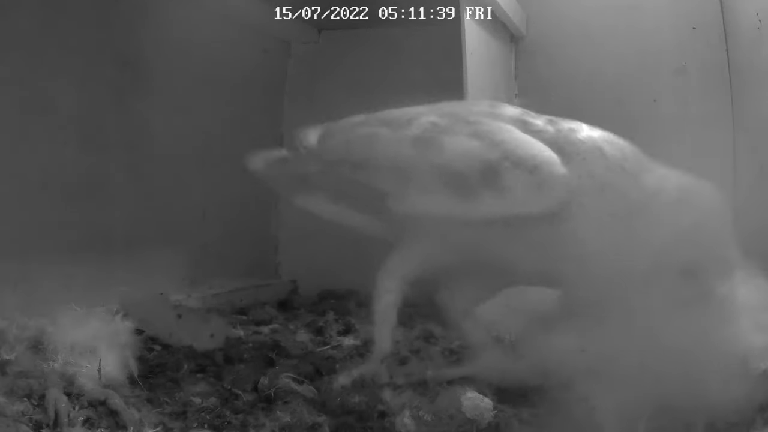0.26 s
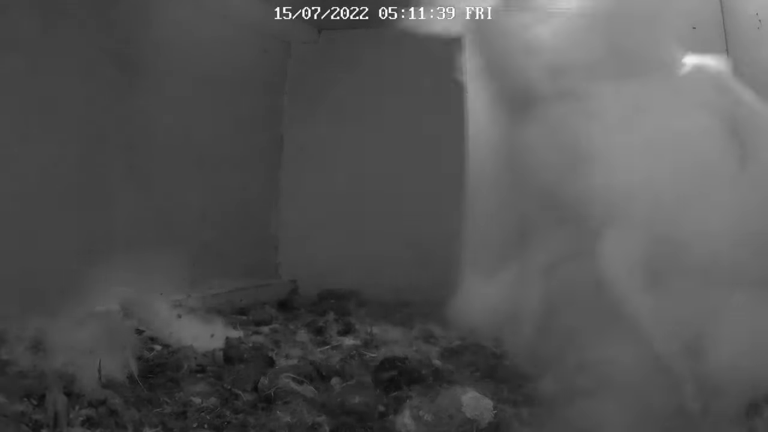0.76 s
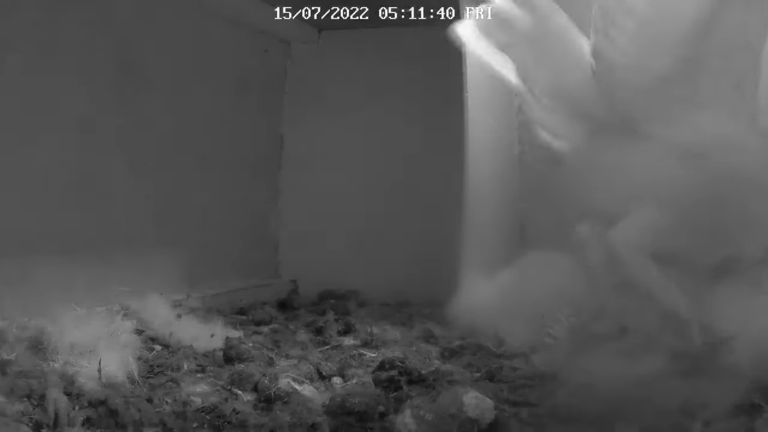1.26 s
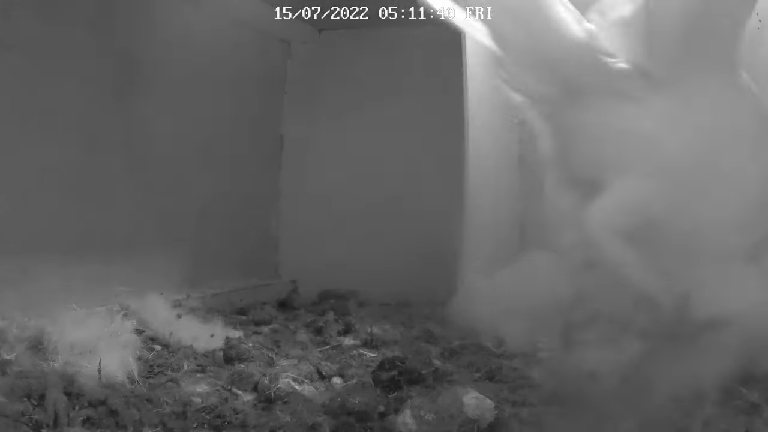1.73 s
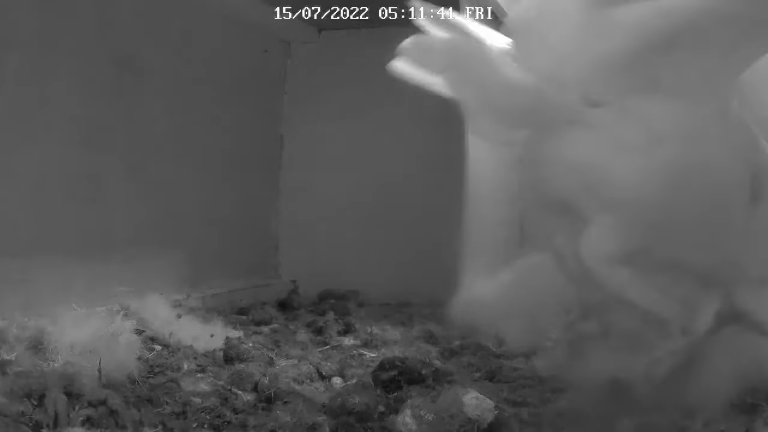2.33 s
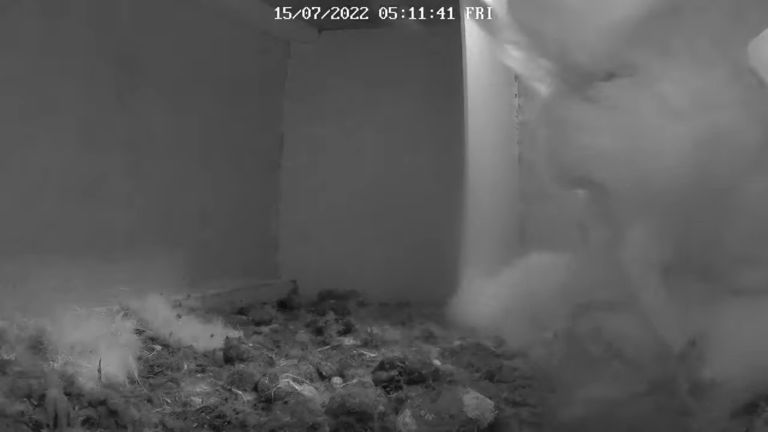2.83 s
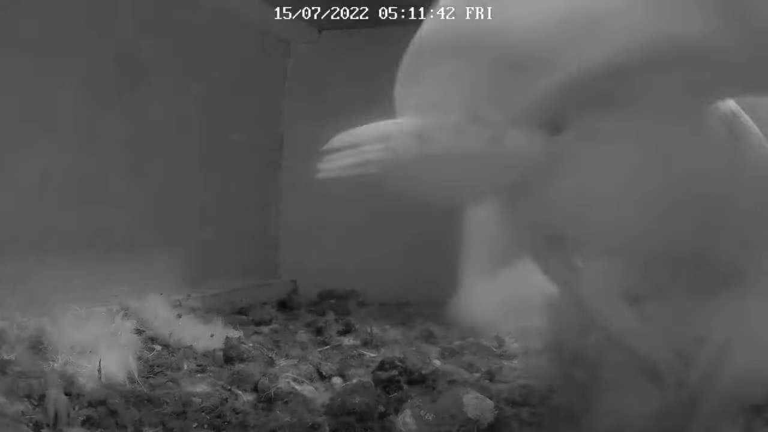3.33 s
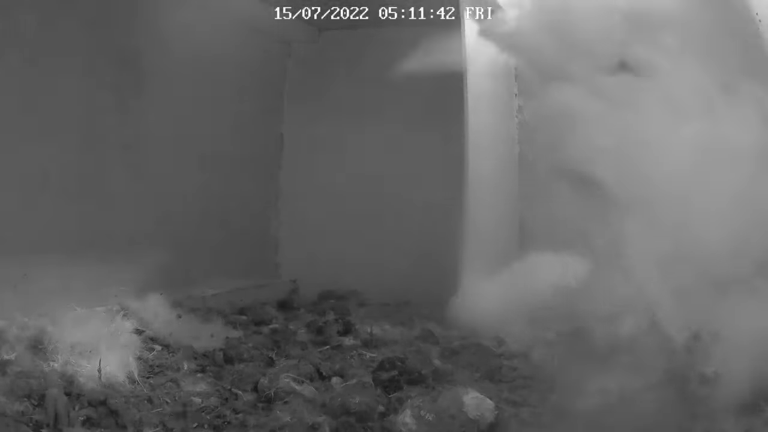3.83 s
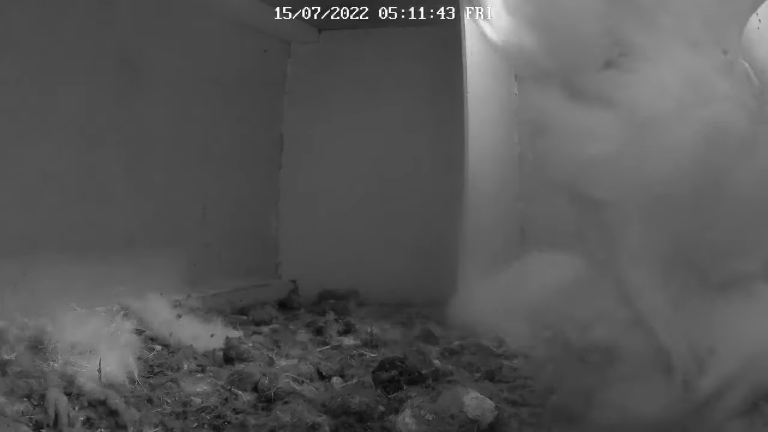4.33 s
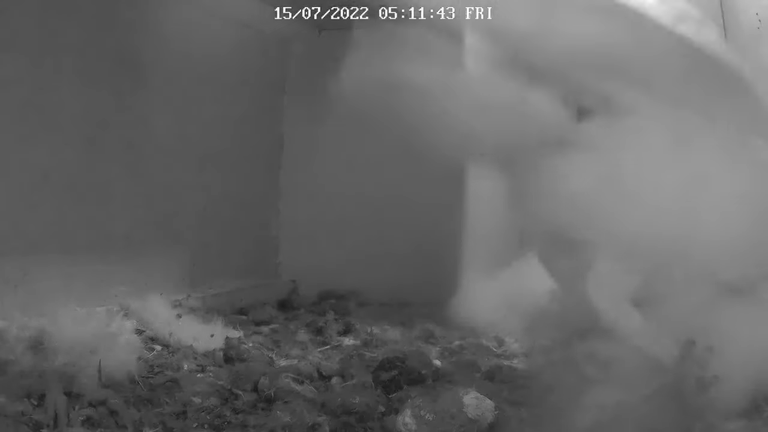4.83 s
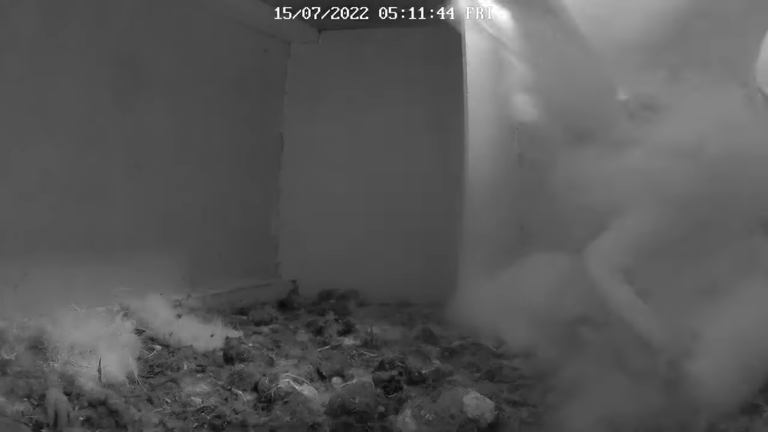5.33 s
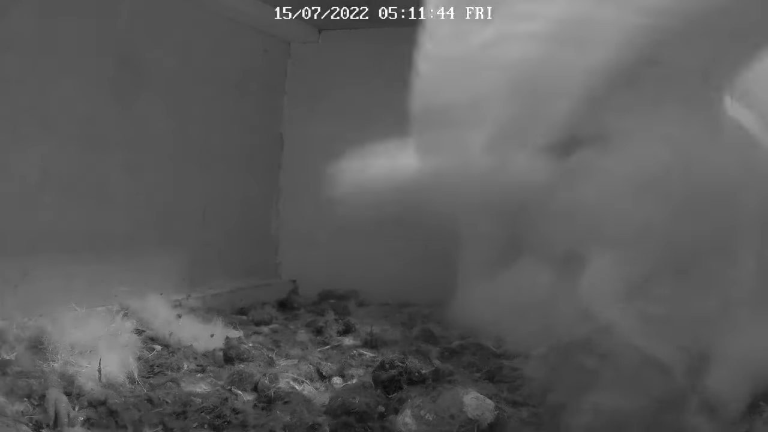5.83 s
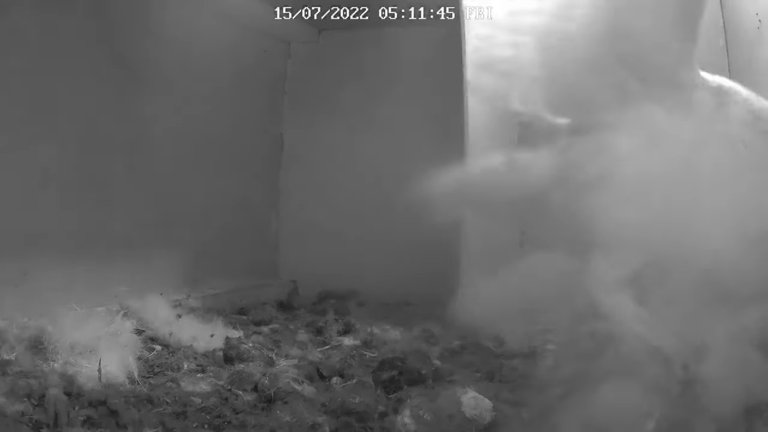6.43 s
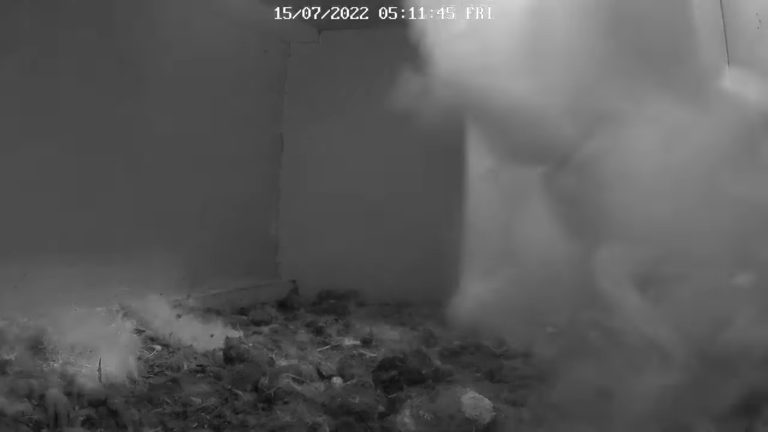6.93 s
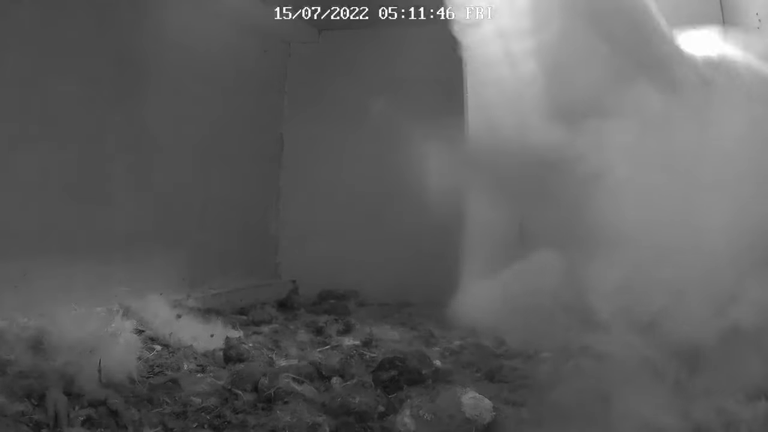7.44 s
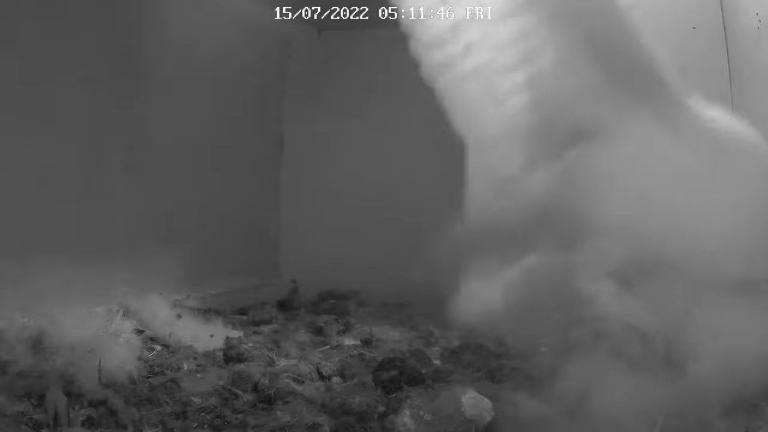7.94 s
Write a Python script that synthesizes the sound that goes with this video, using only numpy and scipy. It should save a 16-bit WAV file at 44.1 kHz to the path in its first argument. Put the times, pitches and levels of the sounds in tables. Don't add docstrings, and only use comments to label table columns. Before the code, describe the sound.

Inside a small wooden nest box at dawn, owls shuffle and bump the walls with low, hollow thuds, brushing feathers and ticking claws. Outside, small birds whistle thinly and a pigeon coos huskily. Strong blows land midway, a brief hissy screech follows, then the hardest bang overloads the small, dull microphone. The loudest screech closes the scene over steady hiss and a faint whine.

```python
import sys
import numpy as np
from scipy import signal
from scipy.fft import rfft, irfft
from scipy.io import wavfile
from scipy.ndimage import uniform_filter1d

SR = 44100
rng = np.random.default_rng(int(sys.argv[2]) if len(sys.argv) > 2 else 0)


def generate_wav(signal):
    frames = np.transpose(np.atleast_2d(signal))
    scaled = np.clip(frames, -1, 1) * 32767
    pcm = np.round(scaled).astype(np.int16)
    wavfile.write(sys.argv[1], SR, pcm)


def field_ratio(decibels):
    return 10 ** (np.asarray(decibels, dtype=float) / 20)


N = 360297


def rms_one(x):
    return x / np.sqrt(np.mean(x ** 2) + 1e-20)


def drift(rate_hz):
    r = np.exp(-2 * np.pi * rate_hz / SR)
    noise = rng.standard_normal(N + SR)
    return rms_one(signal.lfilter([1], [1, -2 * r, r * r], noise)[SR:])


def resonate(x, peaks):
    out = 0
    for k, (hz, width_hz, db) in enumerate(peaks):
        r = np.exp(-np.pi * width_hz / SR)
        b = (1 - r * r) / 2 * np.array([1, 0, -1])
        a = [1, -2 * r * np.cos(2 * np.pi * hz / SR), r * r]
        out = out + (-1) ** k * field_ratio(db) * signal.lfilter(b, a, x)
    return out


def butter(order, hz, side, x):
    return signal.sosfilt(signal.butter(order, hz, side, fs=SR, output="sos"), x)


def played(notes, fade_s):
    t = np.arange(N) / SR
    s, *columns = np.transpose(np.concatenate(notes))
    gate = 0
    for note in notes:
        start_s, end_s = note[0][0], note[-1][0] + fade_s
        gate = gate + np.clip(np.minimum(t - start_s, end_s - t) / fade_s, 0, 1)
    return [np.interp(t, s, c) for c in columns] + [gate]


def sung(rows, hurry, scoop, scoop_s, droop, droop_s, edge_db, attack_s, release_s, sag_db, lag=1):
    u = np.linspace(0, 1, num=41)
    notes = []
    for s, length_s, from_hz, to_hz, db in rows:
        t, left = u * length_s, (1 - u) * length_s
        progress = (1 - np.exp(-hurry * u ** lag)) / (1 - np.exp(-hurry))
        glide_hz = from_hz + (to_hz - from_hz) * progress
        hz = glide_hz * (1 - scoop * np.exp(-t / scoop_s) - droop * np.exp(-left / droop_s))
        edges = np.exp(-t / attack_s) + np.exp(-left / release_s)
        notes.append(np.transpose([s + t, hz, db - edge_db * edges - sag_db * u]))
    return notes


def in_order(notes):
    return sorted(notes, key=lambda note: note[0][0])


def tone(notes, fade_s, wobble, flutter_db, flutter_hz):
    hz, db, gate = played(notes, fade_s)
    phase = 2 * np.pi * np.cumsum(hz * (1 + wobble * drift(flutter_hz))) / SR
    return np.sqrt(2) * gate * field_ratio(db + flutter_db * drift(flutter_hz)) * np.sin(phase)


def stack(hz, levels_db, wobble, wobble_hz, flutter_db):
    phase = 2 * np.pi * np.cumsum(hz * (1 + wobble * drift(wobble_hz))) / SR
    out = 0
    for k, db in enumerate(levels_db, start=1):
        out = out + field_ratio(db + flutter_db * drift(85)) * np.sin(k * phase)
    return np.sqrt(2) * out


def outdoors(x, wet_db, t60_s):
    t = np.arange(SR // 2) / SR
    tail = rng.standard_normal(len(t)) * field_ratio(-60 * t / t60_s) * (t > .012)
    tail = tail / np.sqrt(np.sum(tail ** 2))
    return x + field_ratio(wet_db) * signal.fftconvolve(x, tail)[:N]


# frequency in Hz, density in dB per Hz.
AIR_SPECTRUM = [(41, -28), (70, -4), (150, -7), (299, -6), (357, -17.5), (425, 2), (708, -28.5), (862, -16),
                (1580, -31), (3080, -31), (4940, -30), (5340, -30), (7600, -32), (9880, -63), (16700, -120)]
# frequency in Hz, width in Hz, level in dB.
HUM_PEAK = [(45.7, 12, -56.5)]
AIR_DB, WHINE_HZ, WHINE_DB, WHINE_BEAT_HZ = -62, 5097, -82, 14


def air():
    hz, db = np.transpose(AIR_SPECTRUM)
    grid_hz = np.minimum(np.arange(1, N // 2 + 2) * SR / N, 7000)
    colour = field_ratio(np.interp(np.log(grid_hz), np.log(hz), db))
    hiss = irfft(rfft(rng.standard_normal(N)) * colour, N)
    t = np.arange(N) / SR
    beat = 1 + .25 * np.sin(2 * np.pi * WHINE_BEAT_HZ * t)
    whine = beat * np.sin(2 * np.pi * WHINE_HZ * t)
    hum_hz, hum_width_hz, _ = HUM_PEAK[0]
    narrow = rms_one(resonate(rng.standard_normal(N), [(hum_hz, hum_width_hz, 0)]))
    hum = resonate(narrow, HUM_PEAK)
    return field_ratio(AIR_DB + 0.34 * drift(6.7)) * rms_one(hiss) + hum + field_ratio(WHINE_DB) * rms_one(whine)


# time in seconds, wall rumble in dB.
SHUFFLE = [(0.0, -61.5), (0.6, -86), (0.86, -60), (0.95, -59.5), (1.2, -51.5), (1.36, -60.5), (2.02, -60),
           (2.84, -65), (3.3, -64), (3.64, -63), (4.0, -65.5), (4.8, -66.5), (5.37, -57), (6.1, -58),
           (6.6, -64), (7.05, -58.5), (7.3, -56.5), (8.17, -54)]


def shuffling_db():
    return played([SHUFFLE], .01)[0]


# start in seconds, then boom, panel and knock in dB.
THUMPS = [(0.912, -52, -39.5, -51), (0.961, -34.5, -51, -37), (1.014, -34.5, -42, -38.5),
          (1.049, -35.5, -74, -55), (1.109, -43, -49, -61), (1.158, -51, -54, -46),
          (1.233, -28.5, -24, -21), (1.395, -53, -61, -52), (1.821, -35.5, -32.5, -78),
          (2.028, -70, -74, -47.5), (2.078, -75, -75, -49), (2.268, -57, -70, -47.5),
          (2.776, -47.5, -50, -45.5), (3.63, -60, -48, -52), (3.708, -51, -47, -52),
          (4.241, -21.5, -28, -32.5), (5.412, -14, -17, -32.5), (5.869, -51, -73, -71),
          (5.952, -48, -33.5, -36), (6.499, -34, -35, -60), (6.848, -84, -64, -57.5),
          (7.311, -13, -8.5, -7.5), (7.553, -26, -34, -69), (8.15, -31.5, -57, -45)]
RAP_DB, HARDEST_DB = -24.5, 6.5
SETTLE_DB, SETTLE_S = -22, 0.057


def blow_strengths_db():
    _, boom_db, panel_db, knock_db = np.transpose(THUMPS)
    hardness_db = np.minimum(knock_db - boom_db, HARDEST_DB)
    return np.column_stack([boom_db, panel_db, knock_db, knock_db + RAP_DB + 1.2 * hardness_db])


def settling():
    s, boom_db = np.array(THUMPS)[:, :2].T
    kicks = np.zeros(N)
    kicks[((s + .012) * SR).astype(int)] = field_ratio(SETTLE_DB + boom_db)
    dying = signal.lfilter([1], [1, -np.exp(-1 / (SETTLE_S * SR))], kicks + 1e-18)
    return uniform_filter1d(uniform_filter1d(dying, size=400), size=400)


def ring(x, hz, t60_s):
    r, w = field_ratio(-60 / (t60_s * SR)), 2 * np.pi * hz / SR
    return signal.lfilter([0, np.sin(w)], [1, -2 * r * np.cos(w), r * r], x + 1e-18)


# frequency in Hz, level in dB, t60 in seconds.
BOOM_MODES = [(107.2, -1, 0.37), (134.2, 3.5, 0.16), (155.5, -4, 0.16)]
PANEL_MODES = [(222.3, -2.5, 0.25), (282, -2, 0.074), (313, -11, 0.13)]
KNOCK_MODES = [(354.3, -1.5, 0.072), (398.4, -8.5, 0.17), (455, -4.5, 0.13), (515.3, -3.5, 0.15)]
RAP_MODES = [(762, -4.5, 0.051), (816, -2, 0.13), (1034, -14, 0.086)]
# cut-off in Hz, share in the shuffling in dB, first flex in Hz, flex in dB.
CONTACT = [(202, -5, 161, -1.5), (400, 0, 232, -1), (630, 0.5, 332.7, 8.5), (1160, -26.5, 640, 11)]


def walls(rumble):
    strength_db = blow_strengths_db()
    at = ((np.array(THUMPS)[:, 0] + .002) * SR).astype(int)
    bump_sizes = field_ratio(2.57 * np.minimum(rng.exponential(1, N), 4))
    bumps = (rng.random(N) < 160 / SR) * bump_sizes
    groups = (BOOM_MODES, PANEL_MODES, KNOCK_MODES, RAP_MODES)
    blows, shuffle = 0, 0
    for group, (modes, contact) in enumerate(zip(groups, CONTACT)):
        contact_hz, bump_db, flex_hz, flex_db = contact
        push, rings = np.zeros(N), 0
        push[at] = field_ratio(strength_db[:, group])
        for hz, db, t60_s in modes:
            uneven = np.ones(N)
            uneven[at] = field_ratio(2.0 * rng.standard_normal(len(at)))
            rings = rings - field_ratio(db - 4) * ring(push * uneven, hz, t60_s)
            shuffle = shuffle + field_ratio(db + bump_db) * ring(bumps * rng.standard_normal(N), hz, 0.59 * t60_s)
        cycles = np.arange(int(3 * SR / flex_hz)) * flex_hz / SR - 1
        onset = np.sin(np.pi / 2 * np.clip(2 * (cycles - cycles[0]), 0, 1)) ** 2
        flex = np.exp(-(cycles / 0.6) ** 2) * onset * np.cos(2 * np.pi * cycles)
        blows = blows + butter(4, contact_hz, "low", rings)
        blows = blows + field_ratio(flex_db) * signal.fftconvolve(push, flex)[:N]
    shuffle = rms_one(butter(4, 600, "low", shuffle))
    return butter(2, 80, "high", blows + rumble * shuffle)


# start in seconds, peak in dB, brightness in dB.
TICKS = [(0.945, -67, 3), (1.2488, -60.5, -1), (1.4261, -58, -7), (1.449, -50.5, -23), (2.7142, -78, 5),
         (2.8687, -78, 0), (3.5438, -59, -12), (3.634, -60, -21), (5.4757, -52.5, -0.5),
         (5.8698, -62.5, -1), (5.89, -57.5, -6), (5.9534, -45, -14.5), (6.3904, -74, 13),
         (6.5197, -57, -0.5), (6.8568, -66.5, 7), (6.9321, -60.5, 1), (6.9524, -59.5, -0.5),
         (7.0349, -59, -11), (7.561, -66, 0), (7.7642, -49.5, -10), (7.8865, -61, 3)]
# frequency in Hz, width in Hz, level in dB.
CAVITY = [(912, 280, -2.5), (2087, 240, -2.5), (2880, 260, -4), (4020, 246, 1), (5070, 470, -4.5),
          (6900, 1100, -14)]
TICK_T60_S, TICK_RISE_S, BRIGHT_HZ = .036, .003, 3400
RUSTLE_DB, RUSTLE_FOLLOWS = -79, 0.9


def claws_and_feathers(shuffle_db):
    force = np.zeros((2, N))
    t = np.arange(SR // 10) / SR
    decay = field_ratio(-60 * np.maximum(t - TICK_RISE_S, 0) / TICK_T60_S)
    shape = decay * np.minimum(t / TICK_RISE_S, 1)
    for s, db, bright_db in TICKS:
        first = int(s * SR)
        force[:, first:first + len(t)] += field_ratio(np.array([[db], [db + bright_db]])) * shape
    rustle_db = RUSTLE_DB + RUSTLE_FOLLOWS * (shuffle_db + 60.5)
    grains = field_ratio(rustle_db + 2.62 * drift(25))
    dull, bright = (force + grains) * rng.standard_normal(N)
    both = butter(4, BRIGHT_HZ, "low", dull) + butter(4, BRIGHT_HZ, "high", bright)
    return resonate(both, CAVITY) * field_ratio(13.5)


# start in seconds, length in seconds, pitch from and to in Hz, level in dB.
WHISTLES = [
    (.08, 0.094, 3500, 4300, -74),
    (.16, .05, 3390, 4150, -70),
    (1.47, 0.15, 3290, 4030, -72.5),
    (1.69, .06, 3810, 3990, -67),
    (2.12, 0.065, 3540, 4240, -80),
    (3.04, .12, 3243, 4050, -70.5),
    (4.58, 0.096, 3250, 4010, -68),
    (5.99, 0.1, 3230, 4020, -67),
    (7.78, 0.11, 3400, 4090, -57.5),
]
SLIDES = [
    (.54, .075, 4704, 4160, -67),
    (2.41, .07, 3780, 3310, -83),
]
WHISTLER = dict(lag=2.0, hurry=8.0, scoop=.001, scoop_s=.01, droop=.001, droop_s=.01, edge_db=15, attack_s=.022, release_s=.015, sag_db=-1.5)


def far_whistler():
    slider = dict(WHISTLER, lag=0.96, hurry=0.28, attack_s=0.0078, sag_db=1.5)
    calls = in_order(sung(WHISTLES, **WHISTLER) + sung(SLIDES, **slider))
    far = tone(calls, 0.0049, wobble=.012, flutter_db=5.5, flutter_hz=60.5)
    far = far + field_ratio(-6.5) * np.roll(far, int(.028 * SR))
    return outdoors(far, wet_db=-5, t60_s=0.3)


# start in seconds, length in seconds, pitch from and to in Hz, level in dB.
SONG = [
    (.16, 0.028, 5550, 5800, -59),
    (.335, 0.078, 6640, 6690, -87),
    (.705, 0.089, 5020, 4620, -45.5),
    (4.72, .035, 4270, 3850, -62),
    (7.425, 0.17, 3810, 3858, -72.5),
    (7.935, .065, 5700, 6160, -69.5),
]
# seconds into the slur, pitch in Hz, level in dB.
SLUR = [(0, 6830, -94), (.022, 6160, -76), (.04, 5900, -56), (.058, 5500, -72), (.068, 4950, -58.5),
        (.082, 4520, -61.5), (.1, 4640, -78), (.125, 4520, -91)]
SLUR_STARTS_S = [.022, .192]
# time in seconds, pitch in Hz, level in dB.
HOOK = [(.52, 6850, -78), (.528, 6950, -77), (.548, 6450, -76), (.562, 6020, -66), (.575, 6000, -66),
        (.6, 6300, -76), (.65, 6350, -88)]
ARCH = [(1.39, 4220, -69), (1.415, 4380, -67), (1.44, 4280, -60), (1.465, 3990, -54.5), (1.49, 3910, -70)]
SONGBIRD = dict(hurry=2.4, scoop=0.00062, scoop_s=0.0081, droop=0.0006, droop_s=0.0091, edge_db=28.5, attack_s=0.003, release_s=0.0088, sag_db=8)


def near_songbird():
    slurs = [np.array(SLUR) + [s, 0, 0] for s in SLUR_STARTS_S]
    song = in_order(sung(SONG, **SONGBIRD) + [HOOK, ARCH] + slurs)
    near = tone(song, 0.0048, wobble=0.0032, flutter_db=3.5, flutter_hz=60)
    return outdoors(near, wet_db=-18.5, t60_s=.25)


# start in seconds, length in seconds, pitch from and to in Hz, level in dB.
COOS = [(1.49, 0.35, 425.3, 593.4, -54.5), (2.15, 0.3, 475, 419.3, -56), (2.71, 0.24, 530, 445, -50),
        (3.03, 0.44, 455, 443.4, -53), (3.72, 0.23, 490, 566.7, -53), (4.25, 0.22, 535, 554, -55.5),
        (4.87, 0.39, 490, 402.4, -54.5), (5.53, 0.19, 530, 420, -45.5), (5.86, 0.091, 514.3, 508, -43.5),
        (6.01, .33, 452, 456.6, -51), (6.62, 0.28, 497.3, 561, -56), (6.93, 0.069, 565.3, 543, -52.5),
        (7.14, .41, 523.6, 542.4, -46.5), (7.58, 0.075, 542, 441, -47), (7.78, 0.19, 510, 435, -48.5),
        (7.97, .22, 485, 445.7, -45)]
PIGEON = dict(hurry=0.488, scoop=0.18, scoop_s=.014, droop=.17, droop_s=.016, edge_db=13.5, attack_s=0.0067, release_s=0.024, sag_db=1)


def pigeon():
    coo = tone(sung(COOS, **PIGEON), .02, wobble=.014, flutter_db=2.6, flutter_hz=40)
    return outdoors(coo, wet_db=-6.5, t60_s=0.44)


# start in seconds, length in seconds, pitch from and to in
# Hz, level in dB.
PEEP = [
    (4.715, 0.044, 2250, 2090, -67),
]
HALF_LINE = [
    (8.128, .05, 3560, 3660, -52),
]


def thin_lines():
    lines = sung(PEEP, **SONGBIRD) + sung(HALF_LINE, **WHISTLER)
    return tone(lines, .006, wobble=.005, flutter_db=1.1, flutter_hz=60)


# time in seconds, pitch in Hz, level in dB, beak closure as extra fundamental in dB.
VOICED = [
    [(5.17, 1489, -72, 14), (5.192, 1584, -53, -1), (5.215, 1597, -56.5, -12), (5.25, 1640, -73, 0),
     (5.28, 1623, -61, 7)],
    [(5.375, 1592, -66, -3), (5.389, 1643, -56.5, -11), (5.407, 1518, -67.5, 7), (5.415, 1390, -81, -4)],
    [(7.208, 1660, -70, 0), (7.22, 1555, -61.5, 17), (7.233, 1466, -64, 24), (7.247, 1293, -77, 4)],
    [(8.04, 1284, -53.5, 8), (8.054, 1356, -46.5, -4), (8.078, 1526, -36, -1.5), (8.1, 1572, -43, 2),
     (8.125, 1565, -41.5, -3), (8.148, 1435, -41, 9.5), (8.17, 1406, -46.5, -10)],
]
# frequency in Hz, level in dB.
WINDPIPE = [(1450, -14.5), (2600, -1.5), (3100, 0.5), (4200, 7), (4700, -9), (6000, -34), (7500, -29.5)]


def clean_screeches():
    hz, db, closure_db, gate = played(VOICED, 0.0026)
    pipe_hz, pipe_db = np.transpose(WINDPIPE)
    levels_db = [db + np.interp(k * hz, pipe_hz, pipe_db) for k in range(1, 6)]
    levels_db[0] = levels_db[0] + closure_db
    return gate * stack(hz, levels_db, wobble=0.0042, wobble_hz=119, flutter_db=3.0)


# start in seconds, length in seconds, narrow hiss in dB, wide breath in dB.
HISSED = [
    (5.2, 0.196, -54.5, -69.5),
    (7.073, .135, -68.5, -66.5),
    (8.071, 0.05, -48, -70),
]
# frequency in Hz, width in Hz, level in dB.
THROAT = [(1934, 37, -7), (3775, 230, -2), (4184, 121, 6), (6030, 140, -47), (6910, 680, -33)]
OWL = dict(hurry=1.1, scoop=.001, scoop_s=.01, droop=.001, droop_s=.01, edge_db=24, attack_s=.012, release_s=.01, sag_db=-21)
BREATH_FOLLOWS = 0.44


def hissed_screeches():
    swells = sung([(s, length_s, 1, 1, 0) for s, length_s, *_ in HISSED], **OWL)
    notes = []
    for swell, (_, _, hiss_db, breath_db) in zip(swells, HISSED):
        t, _, swell_db = swell.T
        notes.append(np.transpose([t, hiss_db + swell_db, breath_db + BREATH_FOLLOWS * swell_db]))
    hiss_db, breath_db, gate = played(notes, 0.01)
    breath = rng.standard_normal((2, N)) * field_ratio(0.53 * drift(90))
    narrow = rms_one(resonate(resonate(breath[0], THROAT), [(3160, 4700, 0)]))
    wide = rms_one(resonate(breath[1], CAVITY))
    return gate * (field_ratio(hiss_db) * narrow + field_ratio(breath_db) * wide)


# time in seconds, pitch in Hz, level in dB.
DRONE = [
    [(7.07, 713, -78), (7.12, 720, -65), (7.19, 720, -62), (7.215, 729, -71)],
]
DRONE_HARMONICS_DB = [-3, -7, -5.5, -3, -1.5, -18, -10.5, -11, -9.5, -10]


def hoarse_drone():
    hz, db, gate = played(DRONE, .01)
    return gate * field_ratio(db) * stack(hz, DRONE_HARMONICS_DB, wobble=0.011, wobble_hz=150, flutter_db=4.5)


def scene():
    shuffle_db = shuffling_db()
    box = walls(field_ratio(shuffle_db) + settling()) + claws_and_feathers(shuffle_db)
    outside = far_whistler() + near_songbird() + pigeon()
    owls = thin_lines() + clean_screeches() + hissed_screeches() + hoarse_drone()
    return (air() + box + outside + owls)[None]


def roll_off(x):
    return signal.sosfilt(signal.butter(12, 8480, fs=SR, output="sos"), x)


# start in seconds, end in seconds.
STARVED = [
    (1.222, 1.278),
    (7.301, 7.358),
    (8.006, 8.062),
]
STARVED_HZ, CUTOFF_HZ, OVERLOAD = 4650, 7650, .978


def record(dry):
    full = signal.sosfilt(signal.ellip(10, .5, 70, CUTOFF_HZ, fs=SR, output="sos"), dry)
    top = signal.sosfiltfilt(signal.ellip(8, .01, 60, STARVED_HZ, "high", fs=SR, output="sos"), full)
    starved = played([[(a, 0), (b, 0)] for a, b in STARVED], 0.0052)[-1]
    mix = np.clip(full - starved * top, -OVERLOAD, OVERLOAD)
    return roll_off(mix)


dry = scene()
out = record(dry)
generate_wav(out)
```